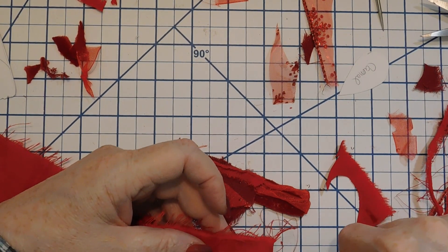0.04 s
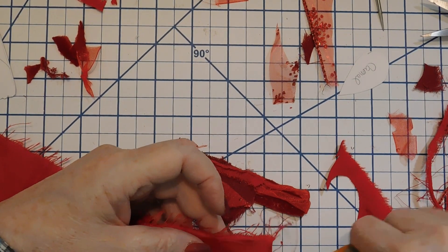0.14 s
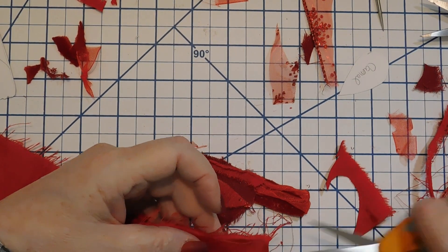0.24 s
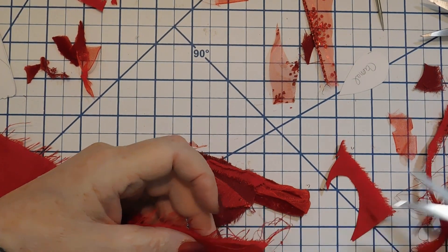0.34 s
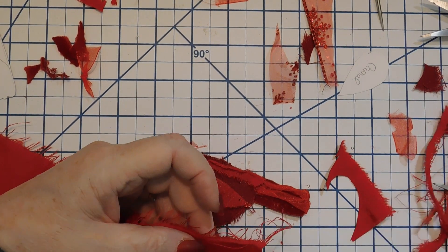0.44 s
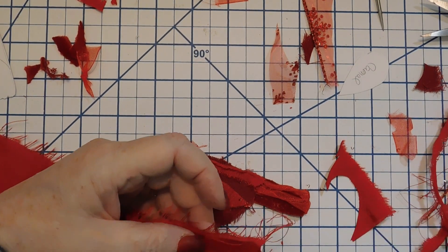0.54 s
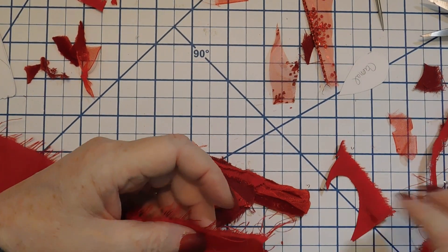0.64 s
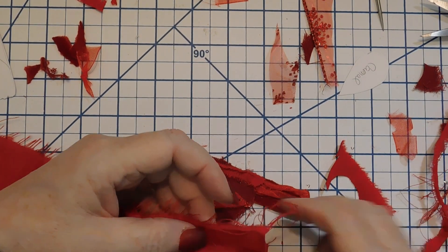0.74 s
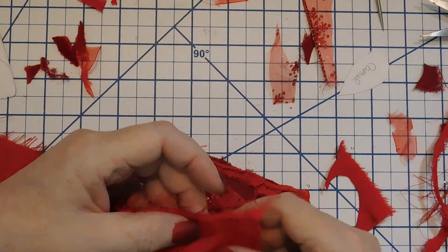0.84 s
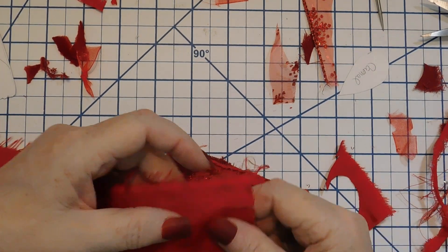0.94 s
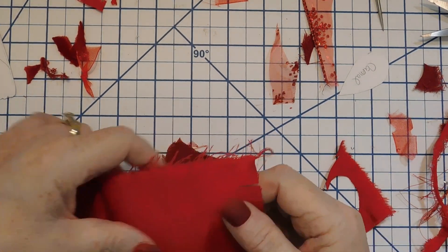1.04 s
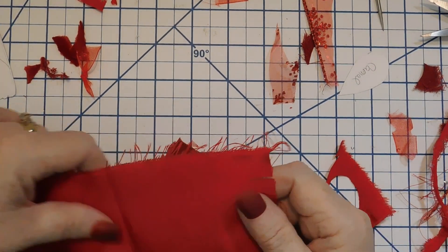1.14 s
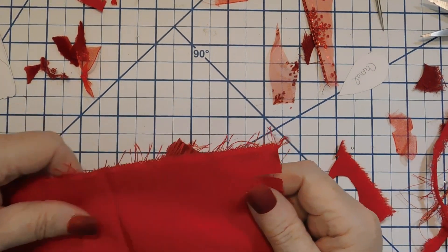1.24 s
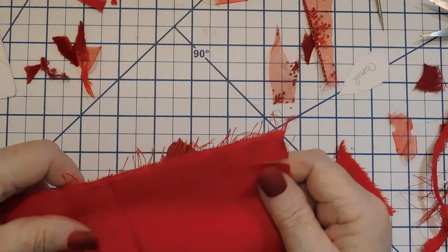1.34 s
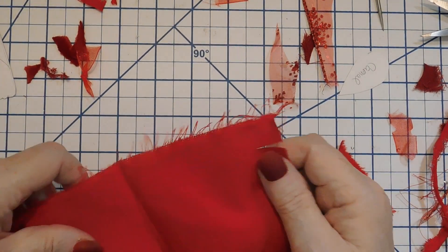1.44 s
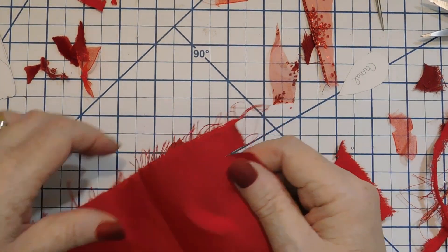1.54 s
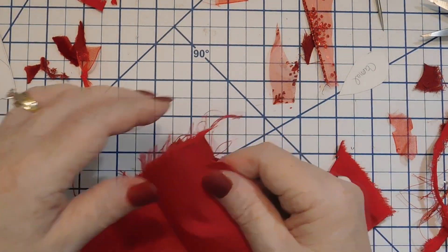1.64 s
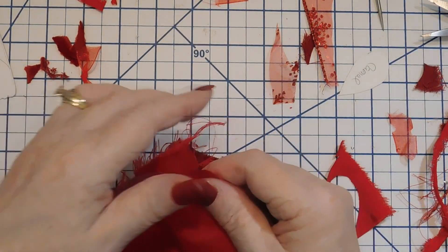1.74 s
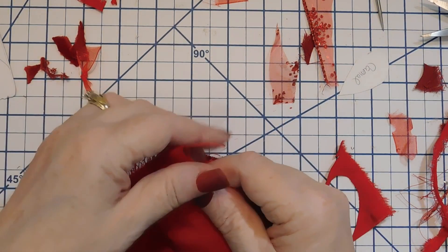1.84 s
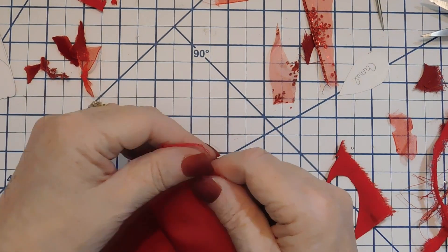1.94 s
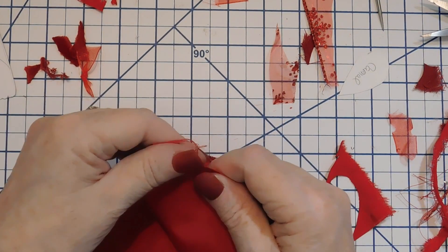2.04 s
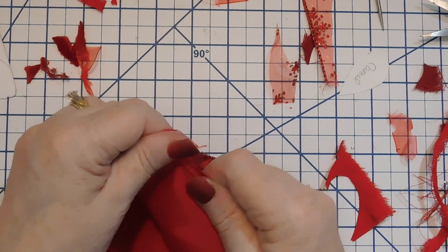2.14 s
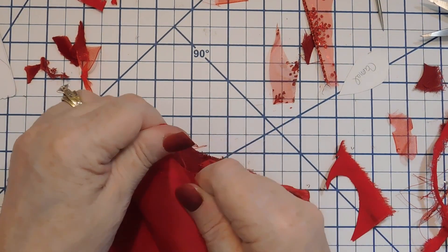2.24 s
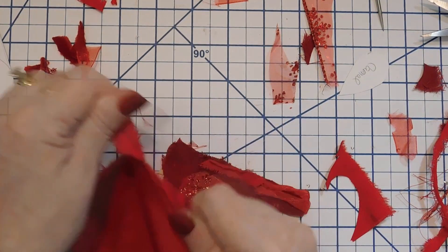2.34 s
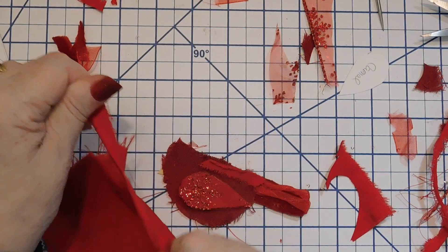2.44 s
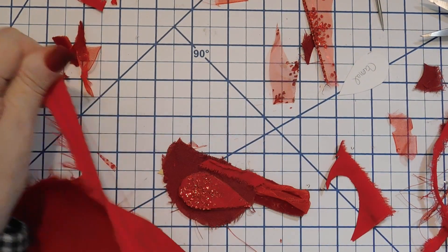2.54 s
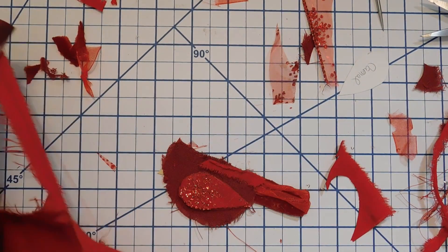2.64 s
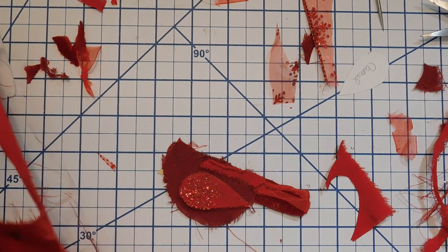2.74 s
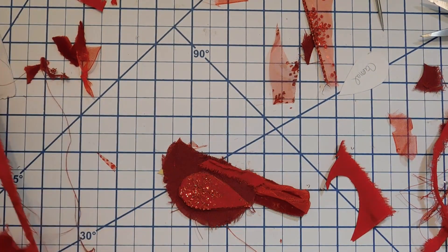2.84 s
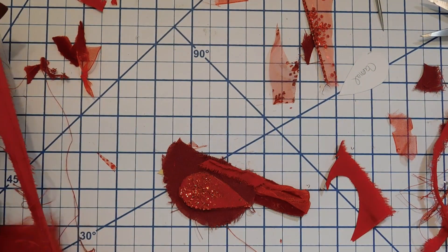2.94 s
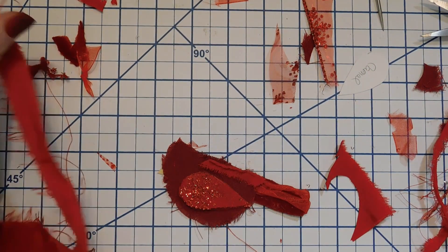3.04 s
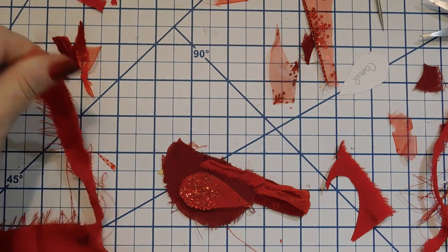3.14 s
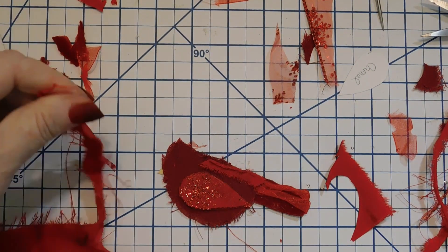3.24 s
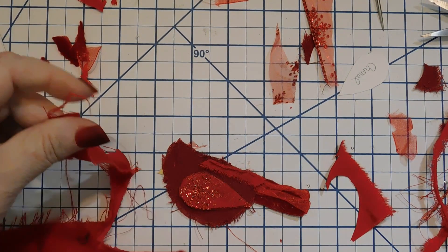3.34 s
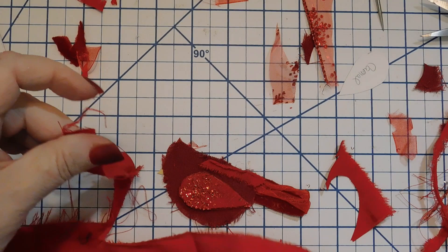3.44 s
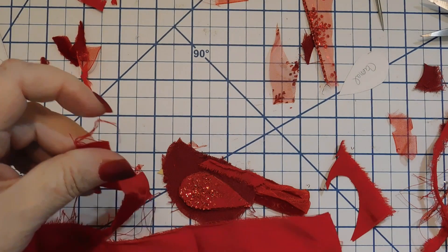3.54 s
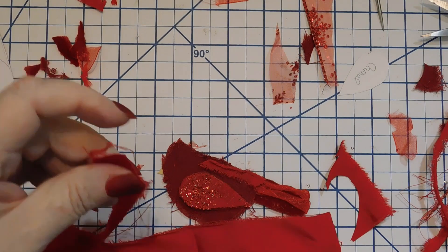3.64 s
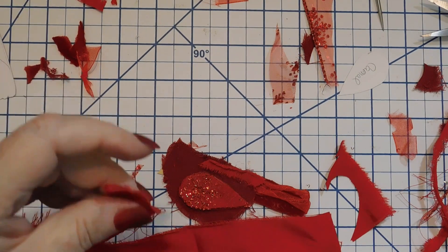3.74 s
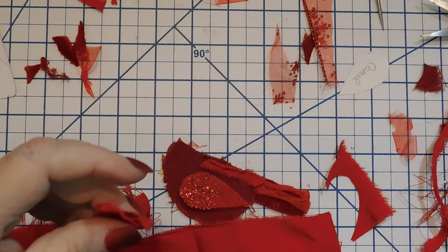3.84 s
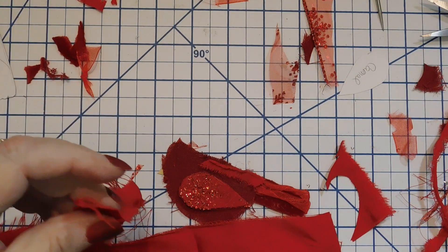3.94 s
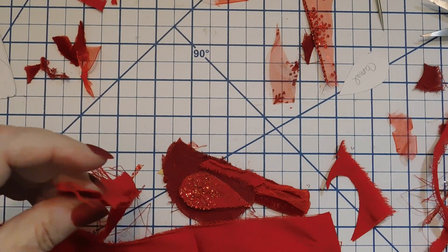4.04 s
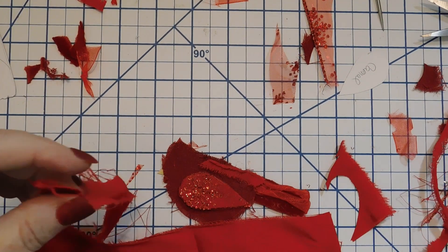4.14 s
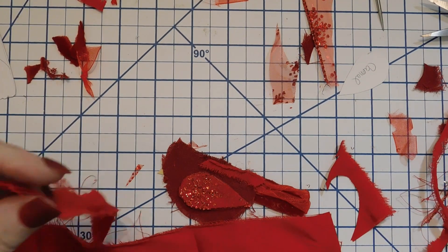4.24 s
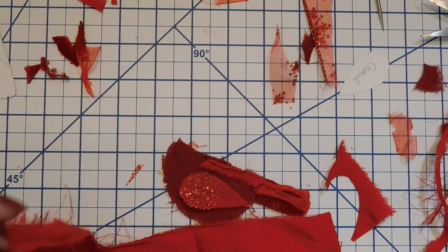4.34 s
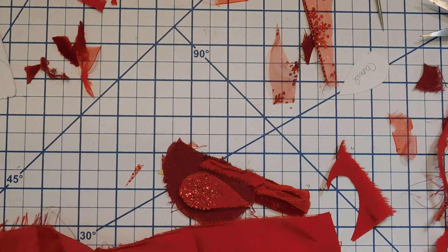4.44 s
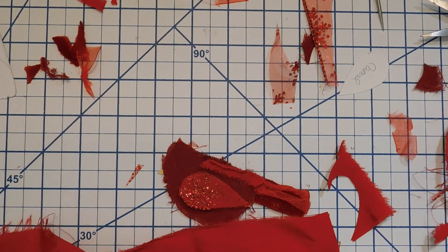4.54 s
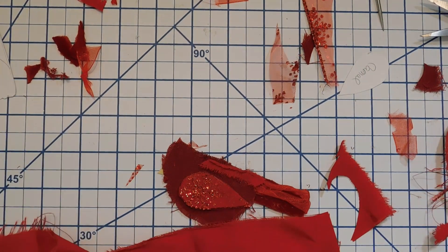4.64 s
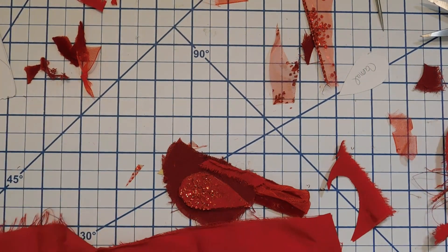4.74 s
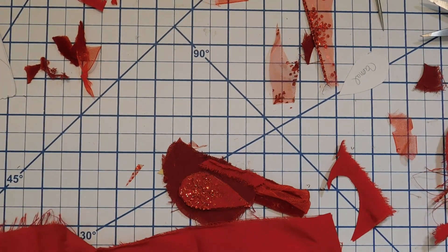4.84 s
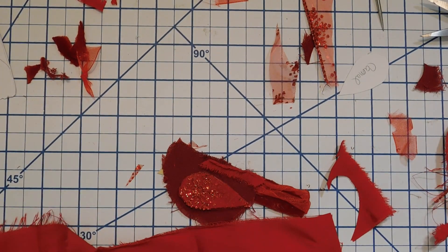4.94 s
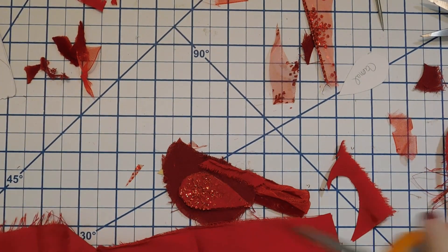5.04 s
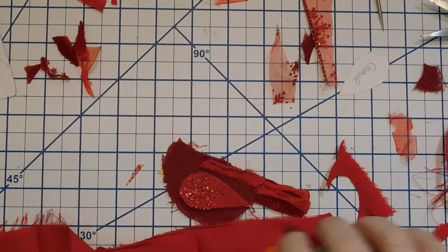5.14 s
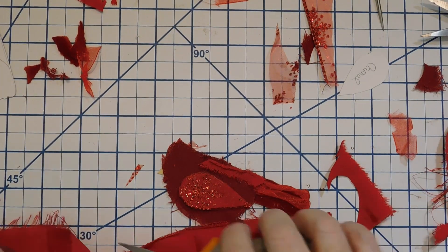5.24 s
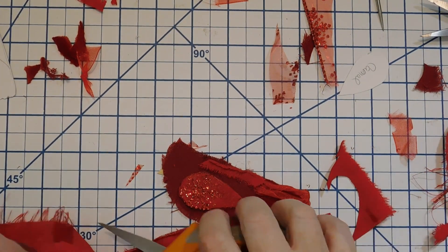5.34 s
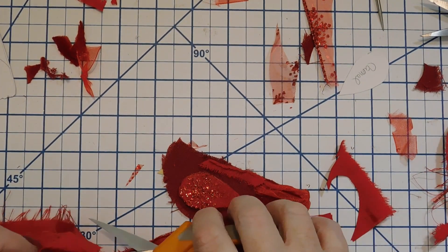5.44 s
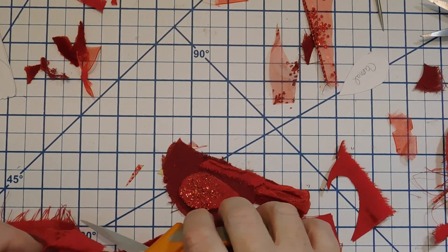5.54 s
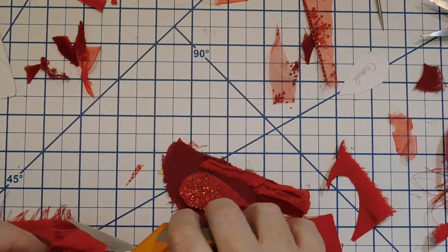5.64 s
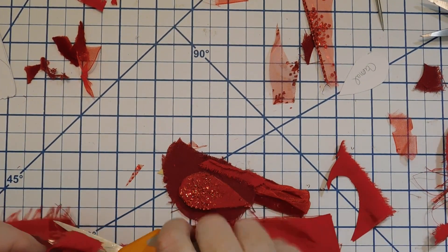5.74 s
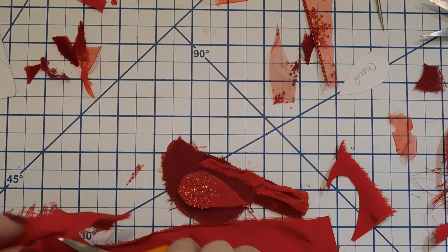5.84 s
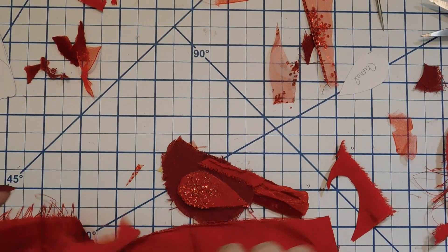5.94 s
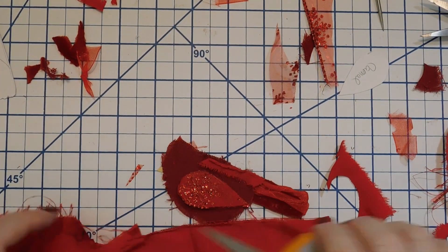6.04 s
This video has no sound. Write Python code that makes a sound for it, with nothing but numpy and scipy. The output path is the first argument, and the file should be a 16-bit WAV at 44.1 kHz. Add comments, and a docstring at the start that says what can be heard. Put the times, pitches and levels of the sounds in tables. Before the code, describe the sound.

A hard clatter of scissors on a mat, a brief crackling fabric rip ending in single thread snaps, then light knocks and faint rustles.

```python
"""Scissors nick a piece of cotton and clatter onto a craft table; the cloth is ripped by hand, brushed and
sorted. The rip is a stutter of noisy thread snaps that deepens as the loose flaps grow; the last four go one by
one. The scissors are noise scrapes with a faint steel ring, then damped modes and rattle as they land on the
mat. Fingers knock as damped modes, taut threads creak as wavering tones; soft friction is swells of shaped
noise. Room tone and soft reflections hold it together until the scissors slide on the mat and start a new cut."""
import sys
import numpy as np
from scipy import signal
from scipy.fft import rfft, irfft
from scipy.io import wavfile
from scipy.ndimage import uniform_filter1d

SR = 44100
rng = np.random.default_rng(int(sys.argv[2]) if len(sys.argv) > 2 else 0)


def master(y):
    """Save y as 16-bit WAV."""
    cut = np.clip(np.atleast_2d(y).T, -1, 1)
    pcm = np.round(cut * 32767)  # scale
    wavfile.write(sys.argv[1], SR, pcm.astype(np.int16))


N = 268701

# Single threads that stand out, the four of the hem last. Each row: start in seconds, level in dB.
STRONG_SNAPS = [(2.3199, -36.5), (2.3601, -27), (2.4253, -31.5), (2.478, -35), (2.598, -24.5),
                (2.7698, -23), (2.7797, -22), (2.7979, -20), (2.9598, -31), (2.9669, -29), (2.9746, -29),
                (2.9835, -25.5)]
# The tear runs in spurts. Each row: start in seconds, length in seconds, base level in dB,
# swell over the spurt in dB, typical threads a second.
SPURTS = [(2.3273, .09, -30.5, 2, 276), (2.4321, 0.015, -30, -1, 266), (2.4896, .033, -29.5, 2.5, 210),
          (2.531, .055, -26, -4, 200), (2.599, 0.148, -24.5, 0.5, 165), (2.75, .095, -25.5, 1, 182),
          (2.8564, 0.018, -25.5, -0.5, 149)]
# Colour of a snap, from short taut flaps to long slack ones and the hem.
# Each row of these five: frequency in Hz, relative level in dB.
TAUT_FLAPS = [(88, -61), (150, -29), (209, -33), (376, -13.5), (457, -14.5), (545, -10.5), (730, -10.5),
              (1140, 2.5), (1690, -4), (2360, -6.5), (5680, -10), (6140, -13), (11300, -11), (14000, -15),
              (16000, -30)]
OPENING_FLAPS = [(88, -66), (150, -39), (494, -17), (566, -5.5), (662, -19), (805, -7), (1480, 1.5),
                 (2020, -12.5), (2310, -5), (2650, -14), (4950, -16), (5910, -26), (10200, -17),
                 (13400, -19.5), (16000, -33)]
LONG_FLAPS = [(88, -33), (150, -22.5), (249, -33.5), (286, -20.5), (422, -23), (545, -0.5), (730, -3.5),
              (888, -4), (1310, -4.5), (1450, -8.5), (1830, -0.5), (2760, -5), (4160, -12.5), (13200, -23),
              (16000, -32)]
SLACK_FLAPS = [(88, -53), (150, -37), (303, -19), (439, -20.5), (545, -3.5), (649, -1), (1100, -10),
               (1310, -2.5), (1450, -6.5), (2220, -10), (2400, -13.5), (3220, -12), (4580, -21.5),
               (13400, -27), (16000, -32)]
HEM = [(88, -51), (200, -21.5), (400, -20.5), (560, 4.5), (750, 3), (950, -2.5), (1400, -5.5), (2200, 1),
       (3400, -12.5), (6600, -7.5), (8500, -17.5), (11000, -16), (16000, -21)]
# Moments at which each of the five colours is reached, in seconds.
COLOUR_TIMES = [2.41, 2.54, 2.68, 2.82, 2.96]
# Scissor blades sliding shut. Each row: start in seconds, length in seconds, level in dB,
# time of the bite in seconds, lift at the bite in dB, ring of the steel in dB.
CUTS = [(0, 0.11, -53.5, 0.06, 4, -7), (5.772, 0.092, -55.5, 5.836, 10.5, -17.5)]
# Colour of blade scraping on blade. Each row: frequency in Hz, relative level in dB.
BLADE_COLOUR = [(410, -33.5), (700, -5), (1020, -13), (1620, 0.5), (2240, -4), (2460, -3), (2920, -9),
                (3600, -9), (5990, -18.5), (9600, -4), (16000, -18)]
# The scissors land and settle. Each row: start in seconds, level in dB, dull above in Hz.
CLACKS = [(0.5327, -9.5, 15000), (0.6112, -21.5, 2130), (0.6486, -48.5, 1300)]
# Modes of the scissors on the mat. Each row: frequency in Hz, width in Hz, energy in dB.
SCISSOR_MODES = [(470, 200, -15), (660, 300, -7), (1050, 450, -9), (1620, 520, 0), (1880, 450, -1),
                 (2430, 400, -7), (4000, 500, -11), (8900, 700, -17), (13100, 600, -19)]
# What the scissors radiate all round. Each row: frequency in Hz, relative level in dB.
CLATTER_COLOUR = [(50, -27.5), (130, -21), (220, -24), (430, -3.5), (700, 0.5), (1100, -3.5), (1700, -3.5),
                  (2400, -6), (3300, -13.5), (5000, -19), (9000, -26.5), (13000, -30), (16000, -34)]
# Knocks on the table. Each row: start in seconds, level in dB, dull above in Hz.
KNOCKS = [(0.504, -33, 655), (0.514, -36, 393), (1.572, -49.5, 1700), (3.9958, -42, 1990),
          (4.006, -35, 1400), (4.346, -32.5, 3100), (4.356, -40, 1400), (4.384, -37, 1240),
          (4.437, -33, 1430), (4.467, -44, 800), (4.644, -56.5, 306.5)]
# Modes of the table before each knock shifts them. Each row: frequency in Hz, width in Hz, energy in dB.
TABLE_MODES = [(412, 100, -10.5), (730, 230, -4), (970, 310, 8), (1302, 320, -7), (1886, 400, -6),
               (2833, 399, -16), (3680, 900, -13)]
# Soft friction: cloth and skin brushing, scissors sliding on the mat, and the body of the last cut.
# Each row: start in seconds, length in seconds, base level in dB, centre of the friction band in Hz, hiss in dB.
SOFT_STROKES = [(0.5, 0.033, -50, 1880, -8), (0.732, 0.08, -57, 1400, -23), (0.949, 0.73, -66.5, 1500, -11),
                (1.717, 0.1, -63.5, 1580, -34), (2.119, 0.2, -63, 1650, -12.5),
                (3.758, 0.044, -55.5, 1560, -46), (3.99, 0.045, -46.5, 470, -22),
                (4.073, 0.037, -54.5, 1100, -33), (4.41, 0.055, -48, 2060, -16),
                (4.458, 0.04, -49.5, 746, -24), (4.501, 0.058, -49, 696, -21.5),
                (4.736, 0.06, -54.5, 1700, -24), (5.04, 0.65, -71, 2220, -1.5),
                (5.724, 0.062, -60, 1380, -29), (5.341, 0.078, -65, 2590, -21),
                (5.815, 0.045, -54, 1700, -20), (5.978, 0.042, -57, 2300, -20)]
# Colour of sliding friction's hiss. Each row: frequency in Hz, relative level in dB.
SLIDING_HISS = [(1500, -18), (3500, -4), (9000, 9.5), (13000, 5.5), (16000, -2)]
# Threads creak as the cloth is pulled taut. Each row: start in seconds, length in seconds, level in dB, mean
# pitch in Hz.
SQUEAKS = [(2.065, 0.018, -65.5, 1780), (2.093, 0.014, -60, 1520), (2.117, 0.014, -55.5, 1820),
           (2.136, 0.022, -72, 1860)]
# The fingers sort the torn strip and its loose threads: from and to, in seconds.
FIDGET_SPAN = (3.1, 5.9)
# Reverberation of the room. Each row: frequency in Hz, time to fall by 60 dB in seconds.
ROOM_DECAY = [(150, 0.48), (500, 0.14), (1400, 0.23), (3000, 0.2), (6000, .24), (14000, 0.22)]
# Colour of the room tone. Each row: frequency in Hz, relative level in dB.
AIR_COLOUR = [(15, -26.5), (25, -8), (44, -7), (59, -14.5), (117, -7.5), (200, -23), (270, -16.5),
              (714, -13), (796, -14), (1840, -13.5), (2350, -20.5), (2690, -21.5), (9570, -36),
              (14800, -32), (16000, -39.5)]
# How much the two microphones differ. Each row: frequency in Hz, gain of the side signal in dB.
STEREO_WIDTH = [(60, -13), (250, -15), (600, -20), (1400, -15), (2800, -10), (5600, -7), (11000, -4)]
# Balance of the microphones. Each row: frequency in Hz, left over right in dB.
STEREO_BALANCE = [(700, 2.5), (1300, -1), (2400, -2.5), (4800, -1), (8100, -4.5), (15000, -6.5)]


def amp(db):
    """Decibels to gain."""
    return 10 ** (np.asarray(db) / 20)


def unit(x):
    """Scales to an rms of one."""
    return x / np.sqrt(np.mean(x ** 2) + 1e-20)


def blow(x):
    """Scales a short sound so that its energy equals 4 ms at an rms of one."""
    return unit(x) * np.sqrt(.004 * SR / x.shape[-1])


def read(points, hz):
    """Reads a table's value on a log-frequency axis."""
    f, value = np.transpose(points)
    return np.interp(np.log(hz + 1), np.log(f + 1), value)


def add(mix, start, sound):
    """Mixes a sound in at a time in seconds."""
    part = mix[:, max(round(start * SR), 0):][:, :sound.shape[-1]]
    part += sound[..., :part.shape[1]]


def colour(x, points):
    """Gives a steady sound a spectrum."""
    hz = np.fft.rfftfreq(x.shape[-1], 1 / SR)
    return irfft(rfft(x) * amp(read(points, hz)), x.shape[-1])


def response(points, size=4096):
    """Builds the causal, minimum-phase impulse response of a spectrum."""
    log_gain = np.log(amp(read(points, abs(np.fft.fftfreq(size, 1 / SR)))))
    spectrum = np.exp(np.conj(signal.hilbert(log_gain)))
    return np.fft.ifft(spectrum).real[:size // 4]


def grainy_noise(size, grain_db):
    """Mid and side noise whose grains vary in strength, for rough surfaces and fibres."""
    return rng.standard_normal((2, size)) * amp(grain_db * rng.standard_normal(size))


def ring(modes, t):
    """Damped modes after one blow: a wider mode dies sooner and starts stronger for the same energy."""
    out = 0
    for hz, width, db in modes:
        decay = np.sqrt(width) * np.exp(-np.pi * width * t)
        out = out + amp(db) * decay * np.sin(2 * np.pi * hz * t)
    return out


def dull(x, hz, bass_hz=260):
    """A softer contact takes away the treble; a small patch of surface radiates little bass."""
    band = [min(bass_hz, hz / 2), min(hz, SR * .45)]
    return signal.lfilter(*signal.butter(2, band, "bandpass", fs=SR), x)


def snap(start, grain_db=3.0, size=300):
    """One thread cracks, then its fibres fray for a few milliseconds, sounding through the cloth either side."""
    t = np.arange(size) / SR
    fibres = unit(grainy_noise(size, grain_db)) * np.exp(-t / .0026)
    fibres[0, 0] += 2.8 * rng.choice([-1, 1])  # the crack
    stages = [TAUT_FLAPS, OPENING_FLAPS, LONG_FLAPS, SLACK_FLAPS, HEM]
    hz = np.geomspace(40, 20000, 90)
    db = np.zeros(len(hz))
    for share, stage in zip(np.eye(len(stages)), stages):  # blend the two nearest colours
        db += np.interp(start, np.sort(COLOUR_TIMES), share) * read(stage, hz)
    flaps = response(np.transpose([hz, db]))
    cloth = signal.fftconvolve(fibres, flaps[None], axes=1)
    return np.array([blow(channel) for channel in cloth])


def rip(weak_db=-1.5, arch_db=3.0, scatter_db=1.2, jitter=.25, rest_s=.003):
    """In each spurt threads go one after another at an uneven pace, and the pull arches up mid-spurt."""
    out = np.zeros((2, N))
    strong_times = np.transpose(STRONG_SNAPS)[0]
    for start, db in STRONG_SNAPS:
        add(out, start, amp(db) * snap(start))
    for start, length, db, swell_db, rate in SPURTS:
        scatter, unevenness = rng.standard_normal((2, 40))
        gaps = np.exp(jitter * unevenness) / rate
        after = np.cumsum(gaps) - gaps
        progress = after / length
        pull_db = swell_db * (progress - .5) + arch_db * (np.sin(np.pi * progress) - .5)
        level_db = db + weak_db + pull_db + scatter_db * scatter
        level_db[0] = db - swell_db / 2  # the thread that held the tear back
        for moment, thread_db in zip(start + after[progress < 1], level_db):
            if abs(strong_times - moment).min() > rest_s:  # the tension drops around a strong snap
                add(out, moment, amp(thread_db) * snap(moment))
    return out


def cuts(grain_db=4.5, ring_hz=2520, ring_width=130, edge_s=.012, bite_s=.0088):
    """Blade scrapes on blade, loudest where it bites through the threads, and the steel rings faintly."""
    out = np.zeros((2, N))
    for start, length, db, bite_at, bite_db, ring_db in CUTS:
        t = np.arange(0, length, 1 / SR)
        fades = np.clip(np.minimum(t, length - t) / edge_s, 0, 1)
        bite = np.exp(-((start + t - bite_at) / bite_s) ** 2)
        stroke = fades * amp(db + bite_db * bite)
        scrape = grainy_noise(len(t), grain_db)
        steel = signal.lfilter(*signal.iirpeak(ring_hz, ring_hz / ring_width, SR), scrape)
        add(out, start, stroke * (unit(colour(scrape, BLADE_COLOUR)) + amp(ring_db) * unit(steel)))
    return out


def clacks(body_db=-0.5, rattle_db=-2.0, rattle_s=0.0012, wet_db=-9.0, count=3):
    """Blades and handles hit the mat in a quick chatter, and the room answers."""
    out, radiated = np.zeros((2, N)), np.zeros((1, N))
    t = np.arange(1500) / SR
    for start, db, hz in CLACKS:
        body = np.zeros((1, len(t)))
        for k in range(count):
            add(body, k * .00058, ring(SCISSOR_MODES, t))
        contacts = rng.standard_normal((2, len(t))) * np.exp(-t / rattle_s)
        hit = amp(rattle_db) * blow(signal.lfilter(response(CLATTER_COLOUR), 1, contacts))
        hit[:1] += amp(body_db) * blow(body)
        hit = signal.lfilter(*signal.butter(3, 370, "highpass", fs=SR), hit)
        add(out, start, amp(db) * dull(hit, hz, bass_hz=59.6))
        add(radiated, start, amp(db) * blow(dull(response(CLATTER_COLOUR), hz)))
    return out + amp(wet_db) * room(radiated)


def thud(level_db=-43.0, top_hz=130, decay_s=.03, side_db=-3.0):
    """The table top shudders under the first blow of the scissors: low noise that dies away."""
    out = np.zeros((2, N))
    t = np.arange(SR // 2) / SR
    rumble = unit(dull(rng.standard_normal((2, len(t))), top_hz, bass_hz=50))
    shudder = rumble * amp([[0], [side_db]]) * np.exp(-t / decay_s)
    add(out, CLACKS[0][0], amp(level_db) * shudder)
    return out


def knocks(scuff_db=-1.0, scuff_s=0.0034, spread=.04, soft_s=0.00091):
    """Fingers and handles knock on the table, each at a slightly different spot and with a short scuff."""
    out = np.zeros((2, N))
    t = np.arange(2000) / SR
    for start, db, hz in KNOCKS:
        scuff = rng.standard_normal((2, len(t))) * np.exp(-t / scuff_s)
        hit = amp(scuff_db) * blow(scuff)
        hit[0] += blow(ring(TABLE_MODES, t * np.exp(spread * rng.standard_normal())))
        hit *= 1 - np.exp(-t / soft_s)  # the cloth cushions the contact
        hit = dull(hit, hz, bass_hz=383)
        add(out, start, amp(db) * np.array([blow(channel) for channel in hit]))
    return out


def soft_friction(grain_db=4.0, crest=0.12, flutter_db=1.5):
    """Each soft stroke swells fast and fades: a papery band of friction noise with sliding hiss."""
    out = np.zeros((2, N))
    for start, length, db, hz, hiss_db in SOFT_STROKES:
        progress = np.linspace(0, 1, int(length * SR))
        grains = grainy_noise(len(progress), grain_db)
        band = [(hz / 10, -36), (hz / 2, -10), (hz, 0), (hz * 2, -15), (hz * 10, -42)]
        body = unit(colour(grains, band))
        hiss = amp(hiss_db) * unit(colour(grains, SLIDING_HISS))
        wander = uniform_filter1d(rng.standard_normal(len(progress)), 500)
        flutter = amp(flutter_db * unit(wander))
        stroke = np.sqrt(np.interp(progress, [0, crest, 1], [0, 1, 0]))
        add(out, start, amp(db) * stroke * flutter * (body + hiss))
    return out


def squeaks(waver=0.054):
    """Threads creak under tension in short chirps of unsteady pitch."""
    out = np.zeros((2, N))
    for start, length, db, hz in SQUEAKS:
        drift = unit(uniform_filter1d(rng.standard_normal(int(length * SR)), 40))
        tone = np.sin(2 * np.pi * np.cumsum(hz * (1 + waver * drift)) / SR)
        add(out[:1], start, amp(db) * unit(tone * np.hanning(len(tone))))
    return out


def fidgets(level_db=-75.0, scatter_db=8.0, length_s=0.076, count=9):
    """Sorting fingers leave faint wisps of fibre hiss, one at a chance moment in each share of the span."""
    out = np.zeros((2, N))
    size = int(length_s * SR)
    for k in range(count):
        start = np.interp(k + rng.random(), [0, count], FIDGET_SPAN)
        wisp = unit(colour(rng.standard_normal((2, size)), SLIDING_HISS)) * np.hanning(size)
        add(out, start, amp(level_db + scatter_db * rng.uniform(-1, 1)) * wisp)
    return out


def room(x, build_s=0.0066, treble_db=-1.5, side_db=7.0):
    """Reflections of the mid signal build up over a few milliseconds and die away at a pace set by pitch."""
    taps = rng.standard_normal((2, SR // 2))
    hz, t, z = signal.stft(taps, SR, nperseg=256)
    tilt_db = read([(2000, 0.02), (6000, treble_db)], hz)[:, None]
    z *= amp(tilt_db - 60 * t / read(ROOM_DECAY, hz)[:, None])
    tail = signal.istft(z, SR, nperseg=256)[1]
    tail *= 1 - np.exp(-(np.arange(tail.shape[1]) / SR / build_s) ** 2)
    tail *= amp([[0], [side_db]]) / np.linalg.norm(tail[0])
    return signal.fftconvolve(x[:1], tail, axes=1)[:, :N]


def room_tone(air_db=-63.5, drone_hz=125, drone_db=-11.0):
    """Steady air noise with a low ventilation drone, a resonant band of noise drone_db against the air."""
    noise = rng.standard_normal((2, N))
    drone = signal.lfilter(*signal.iirpeak(drone_hz, 4, SR), rng.standard_normal((2, N)))
    return amp(air_db) * (unit(colour(noise, AIR_COLOUR)) + amp(drone_db) * unit(drone))


def microphones(pair, late_s=0):
    """Mid and side reach two close microphones: bass shared, treble leaning right, the left one late_s late."""
    hz = np.fft.rfftfreq(N, 1 / SR)
    mid = rfft(pair[0])
    side = rfft(pair[1]) * amp(read(STEREO_WIDTH, hz))
    lean = amp(read(STEREO_BALANCE, hz))
    left = lean * (mid + side) * np.exp(-2j * np.pi * hz * late_s)
    return irfft(np.array([left, mid - side]) * 2 / (1 + lean), N)


def scene():
    """The hands work in front of the microphones; the scissors land to the right."""
    handling = [(rip(), -12.0), (knocks(), -8.0),
                (cuts() + soft_friction() + fidgets() + squeaks(), -10.0)]  # sound, room send in dB
    direct = sum(sound for sound, wet_db in handling)
    echo = room(sum(amp(wet_db) * sound for sound, wet_db in handling))
    front = microphones(direct + echo + thud() + room_tone())
    return front + microphones(clacks(), late_s=.00009)


def record(dry, edge_hz=16000):
    """Clips at full scale, then limits the band with a steep low-pass."""
    edge = signal.firwin(401, edge_hz, window=("kaiser", 9), fs=SR)
    return signal.oaconvolve(np.clip(dry, -1, 1), edge[None], "same")


dry = scene()
out = record(dry)
master(out)
```